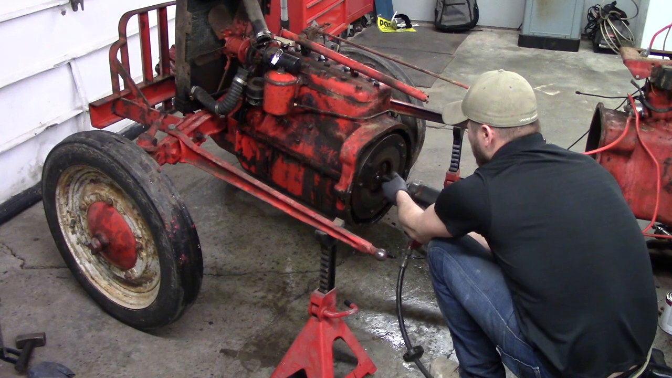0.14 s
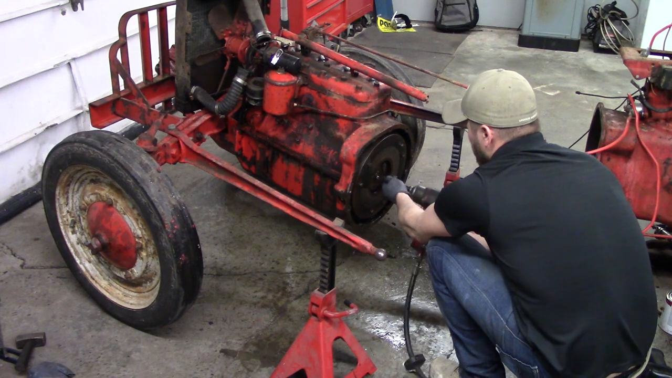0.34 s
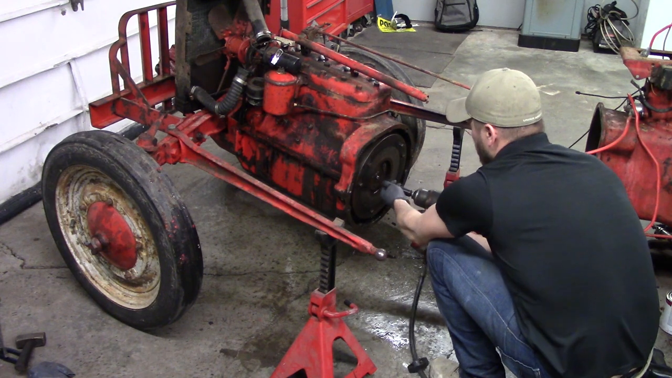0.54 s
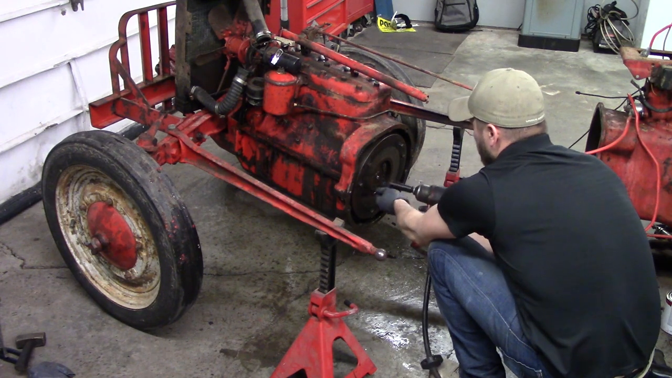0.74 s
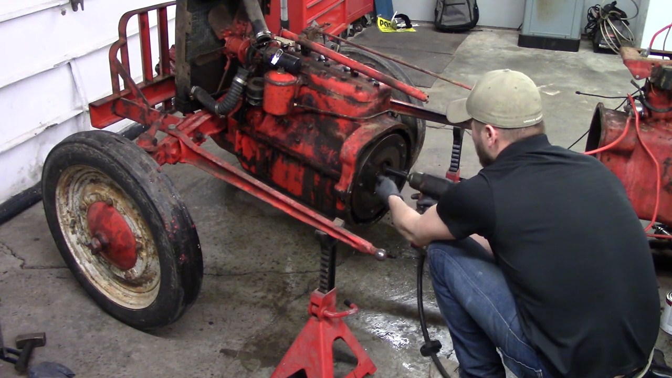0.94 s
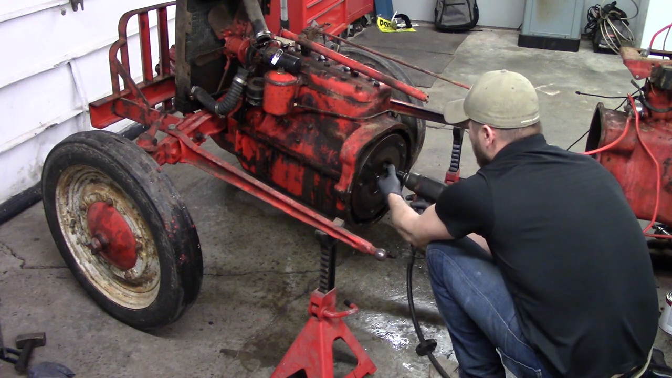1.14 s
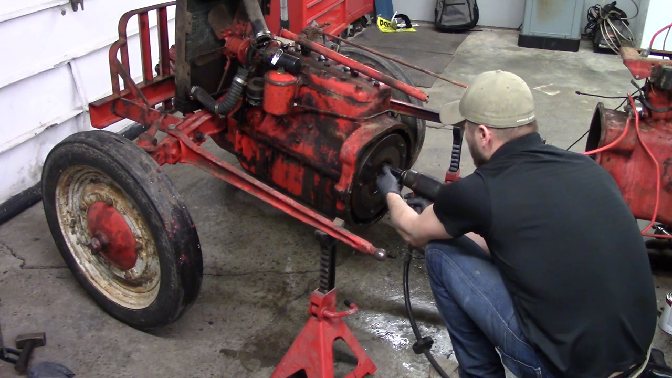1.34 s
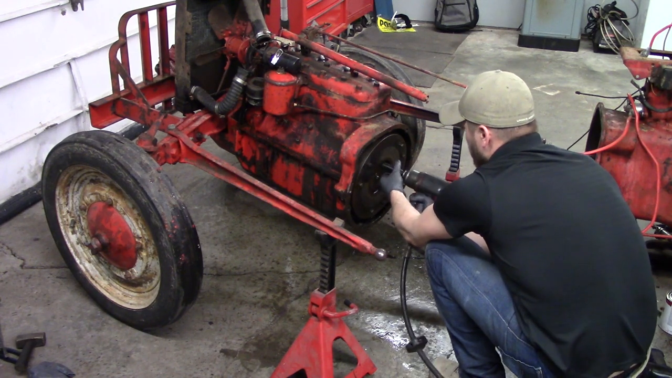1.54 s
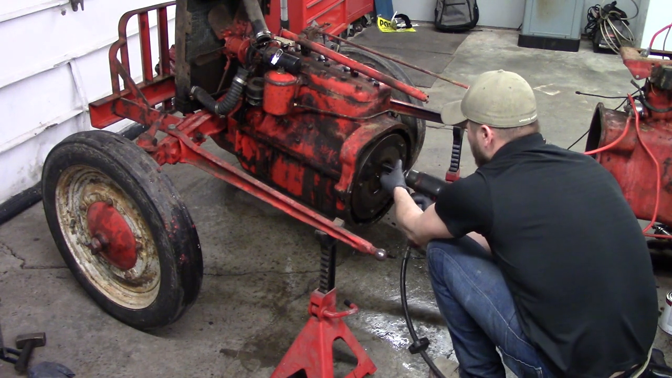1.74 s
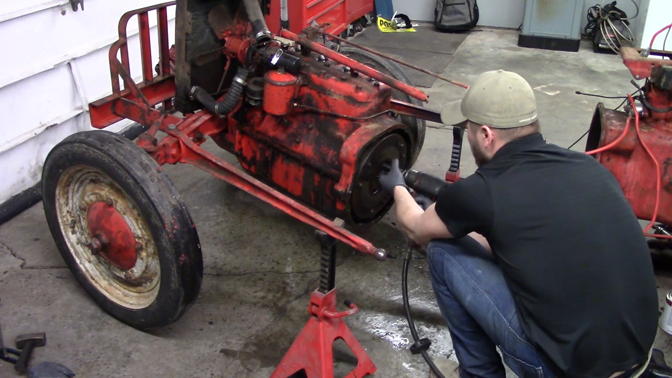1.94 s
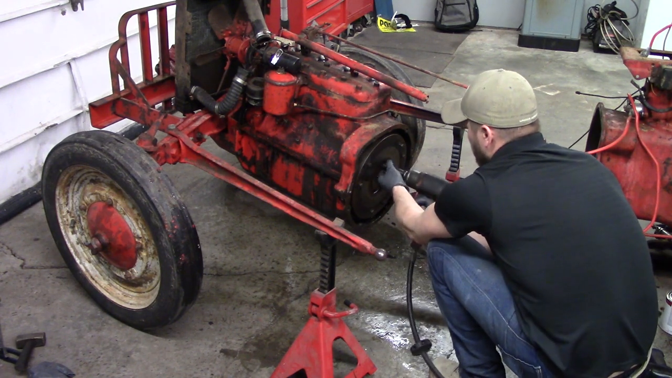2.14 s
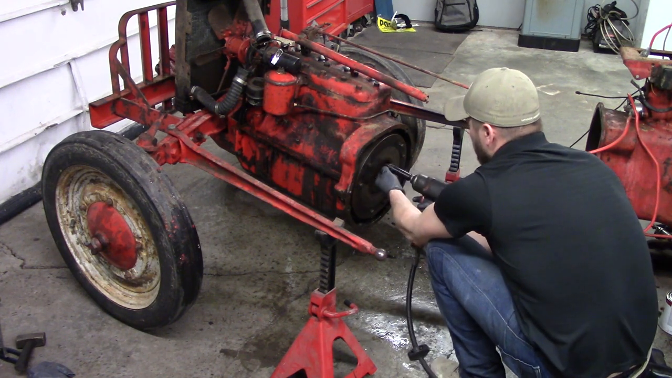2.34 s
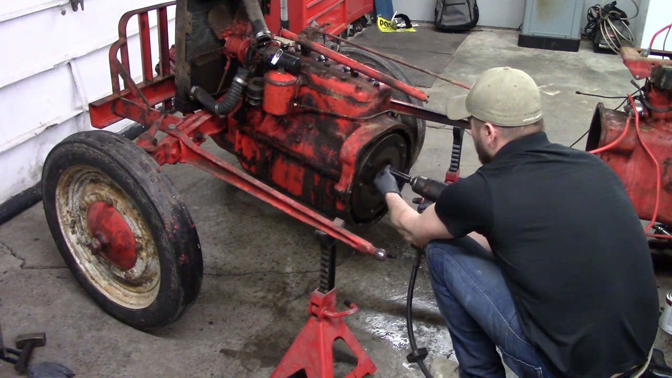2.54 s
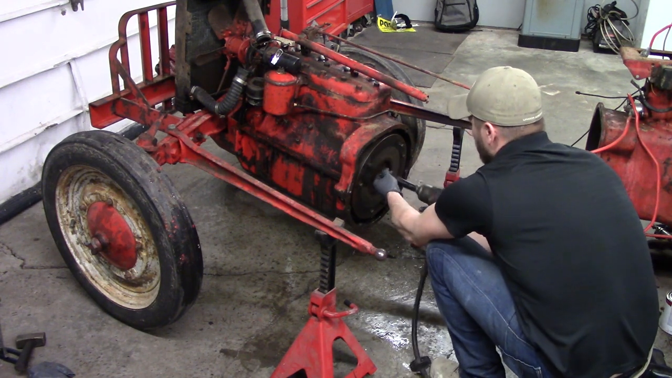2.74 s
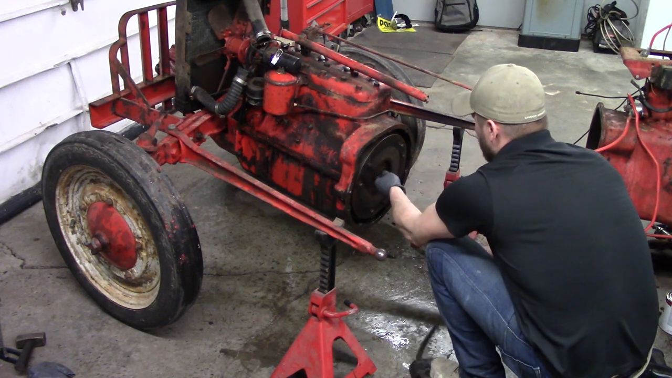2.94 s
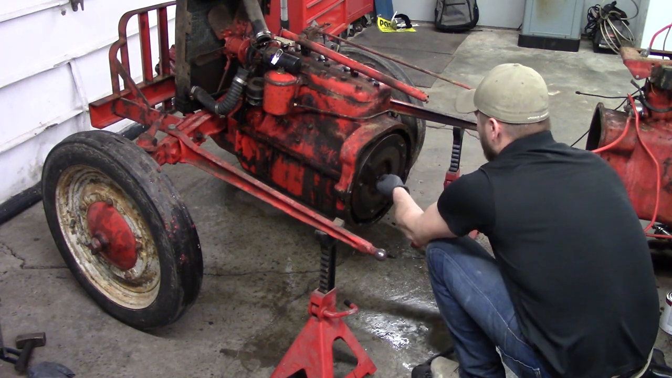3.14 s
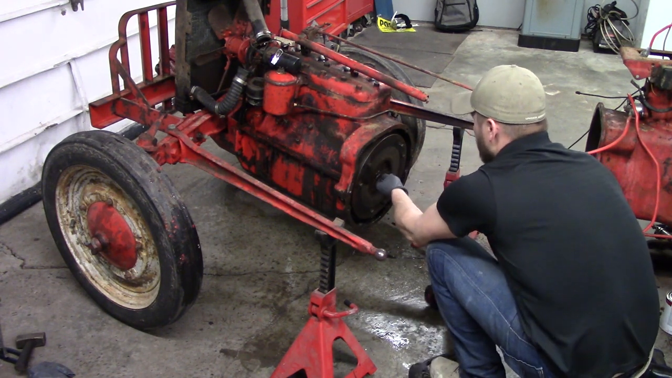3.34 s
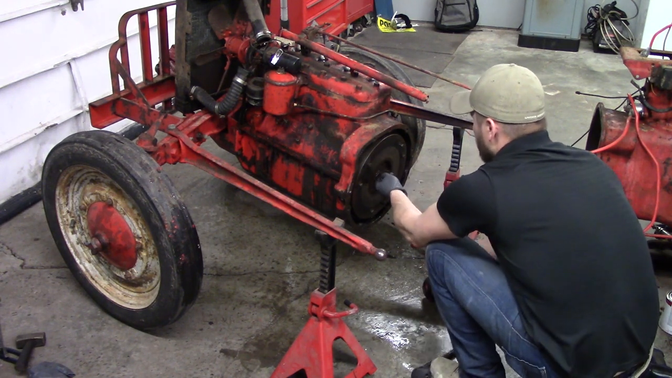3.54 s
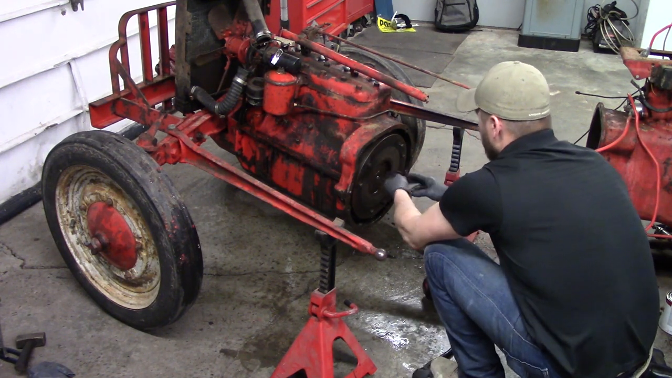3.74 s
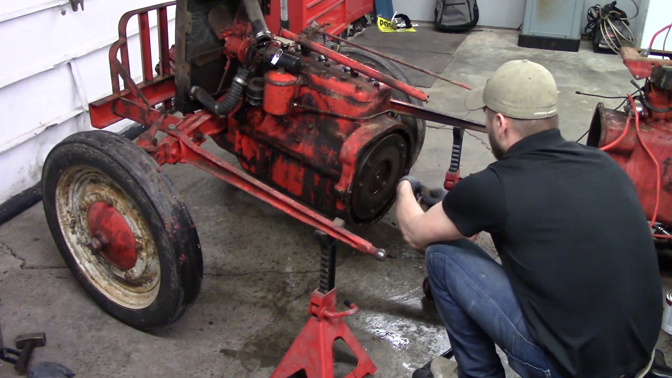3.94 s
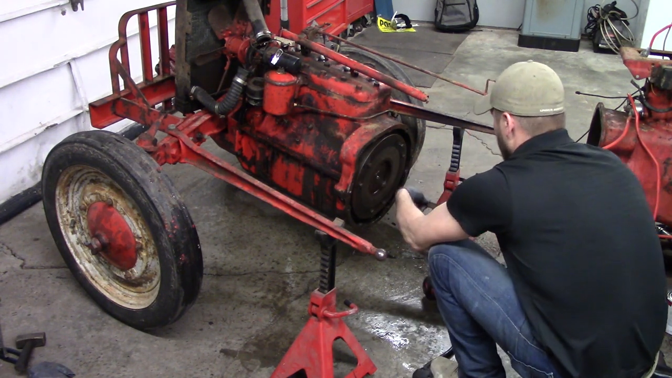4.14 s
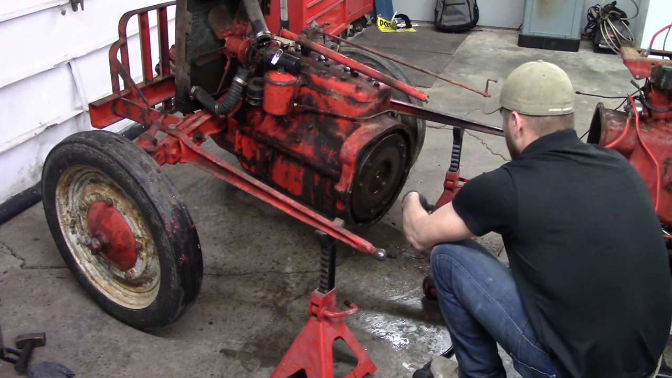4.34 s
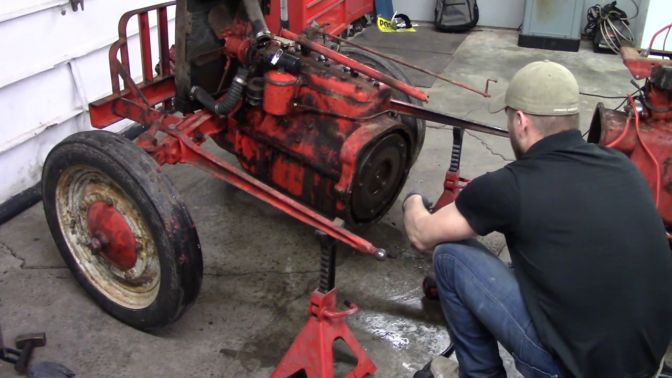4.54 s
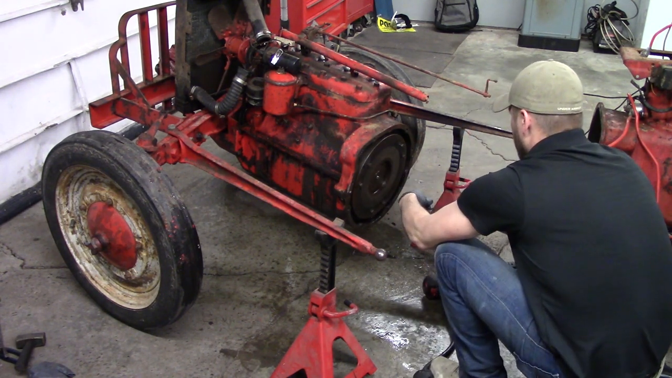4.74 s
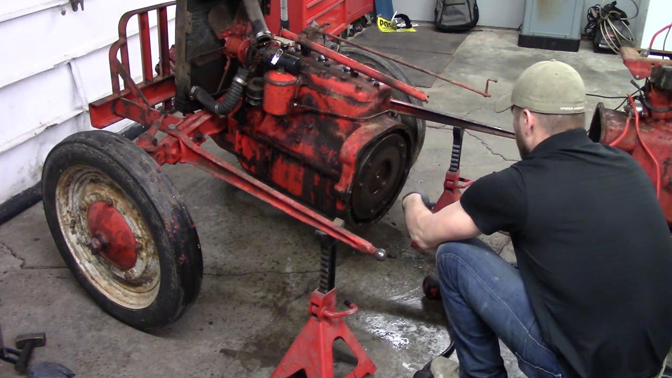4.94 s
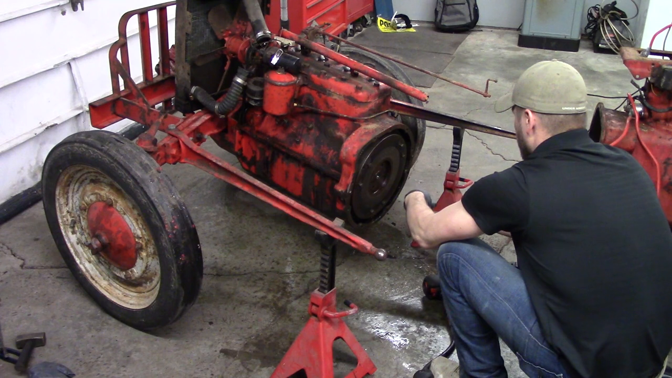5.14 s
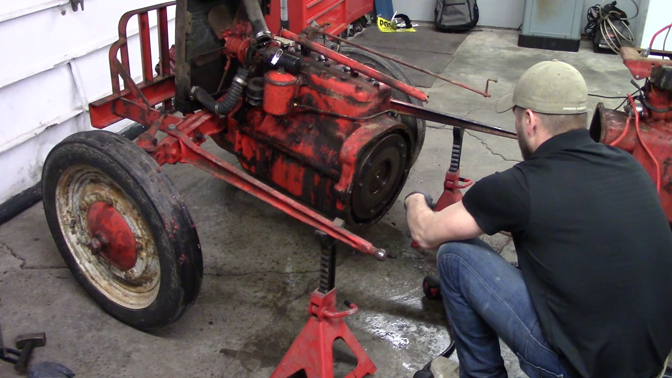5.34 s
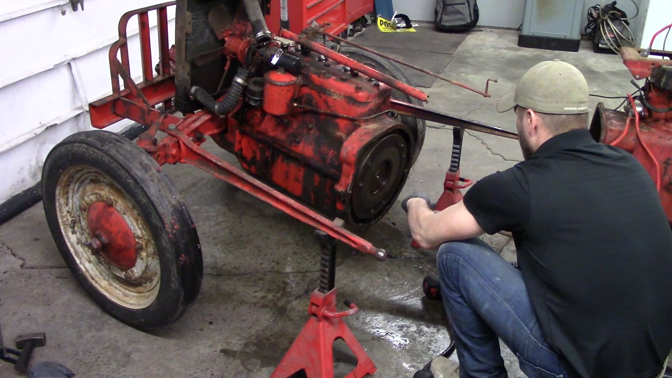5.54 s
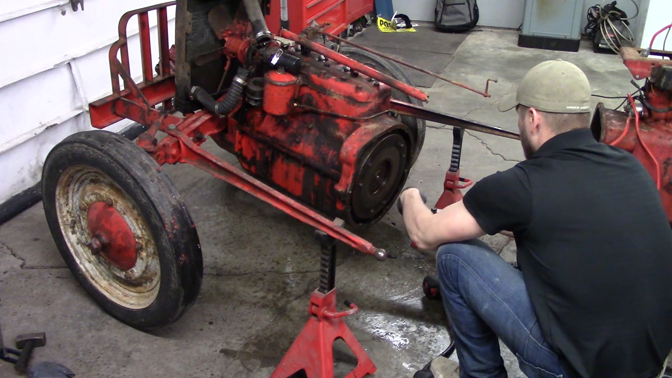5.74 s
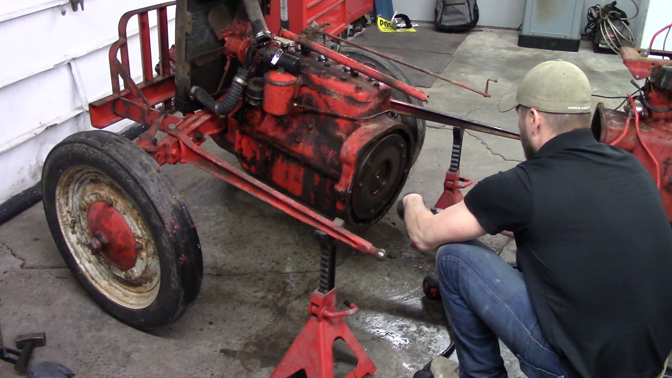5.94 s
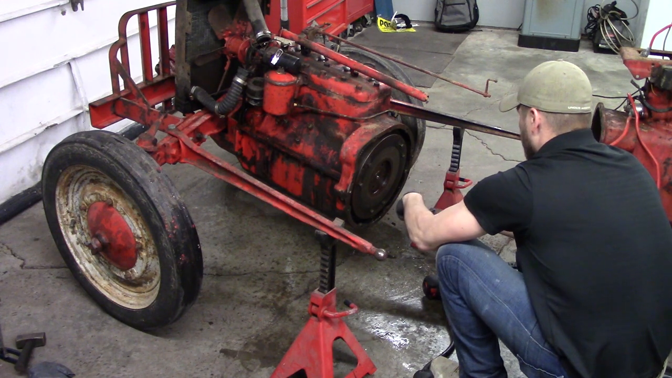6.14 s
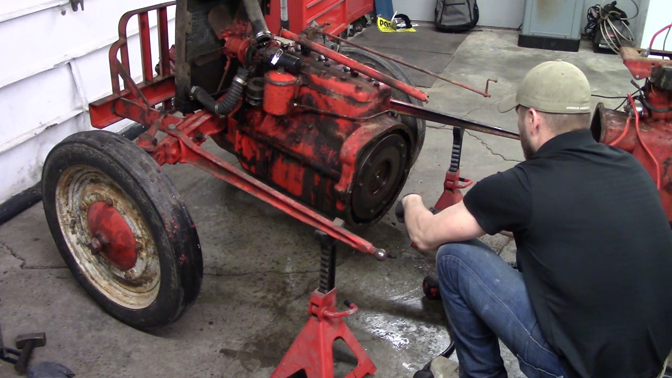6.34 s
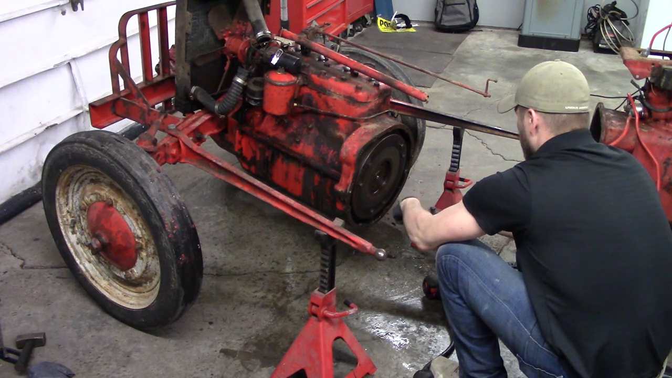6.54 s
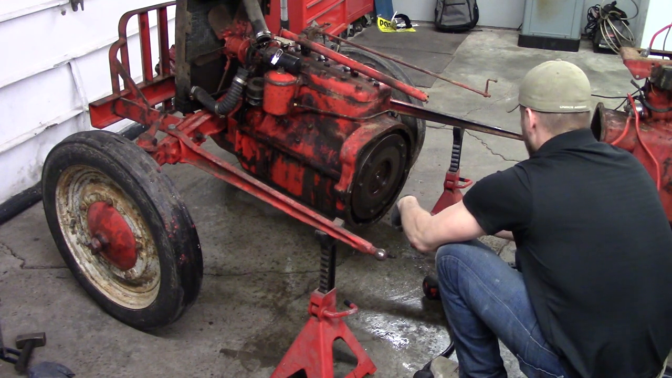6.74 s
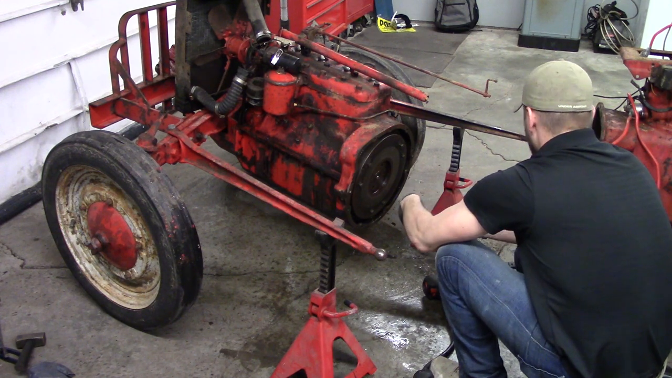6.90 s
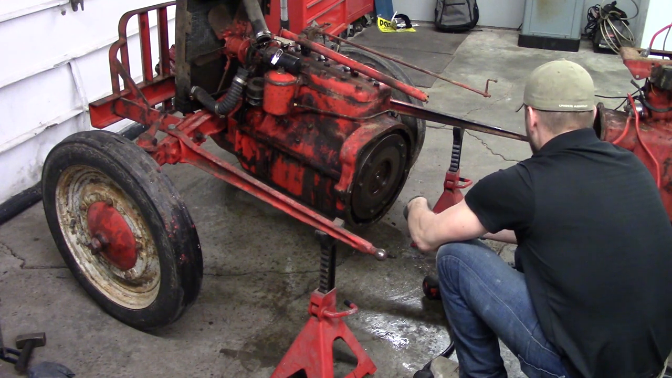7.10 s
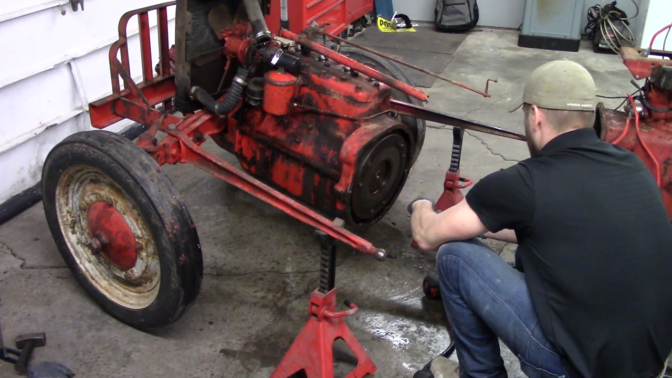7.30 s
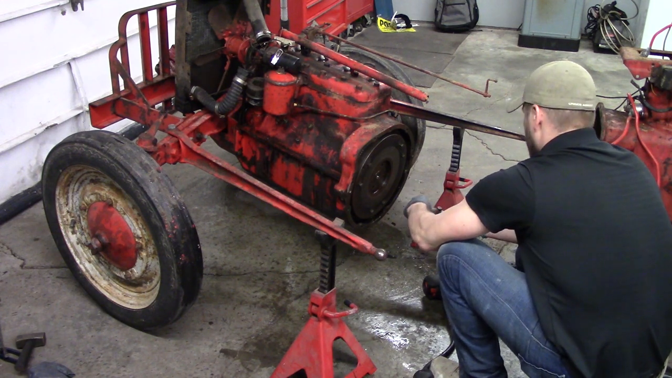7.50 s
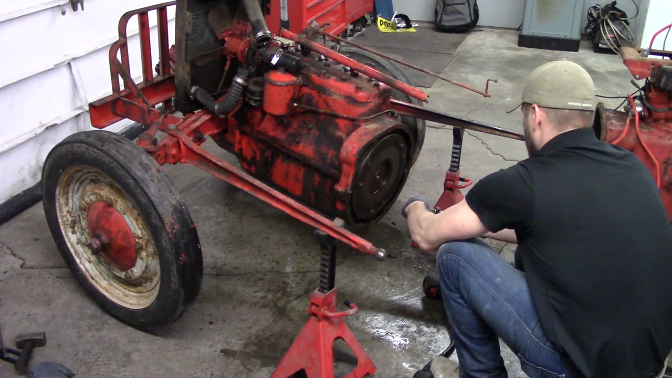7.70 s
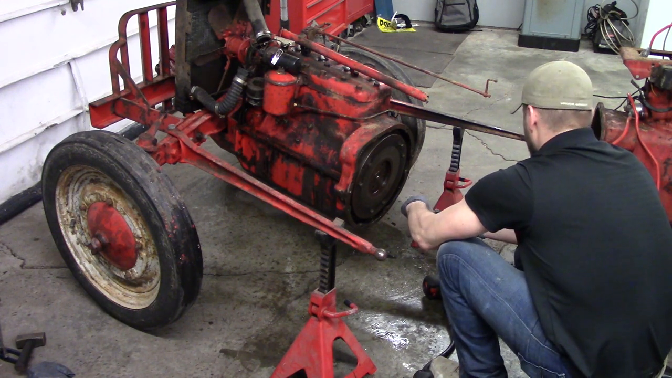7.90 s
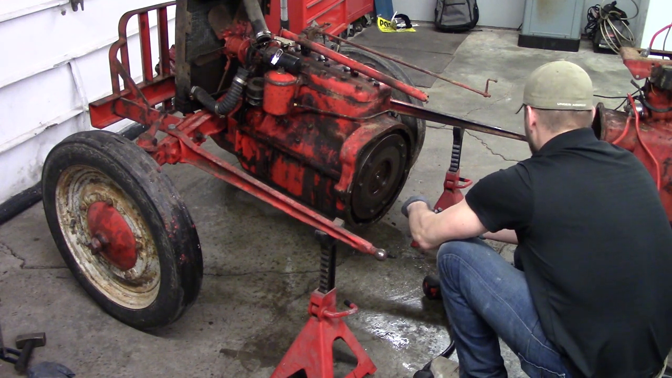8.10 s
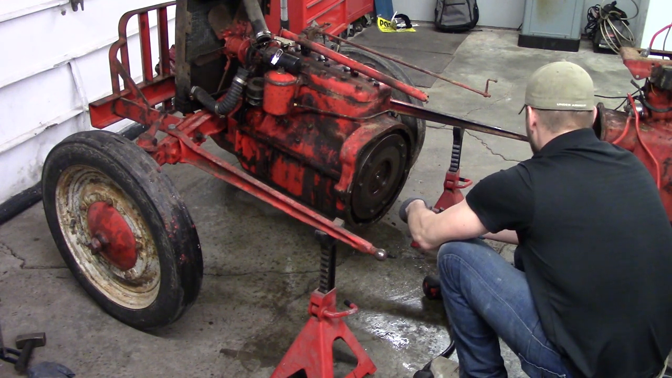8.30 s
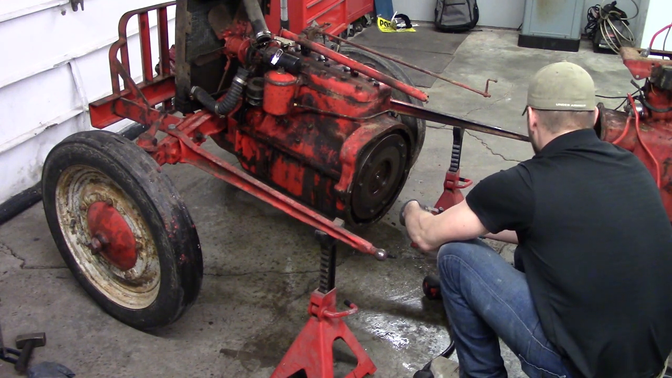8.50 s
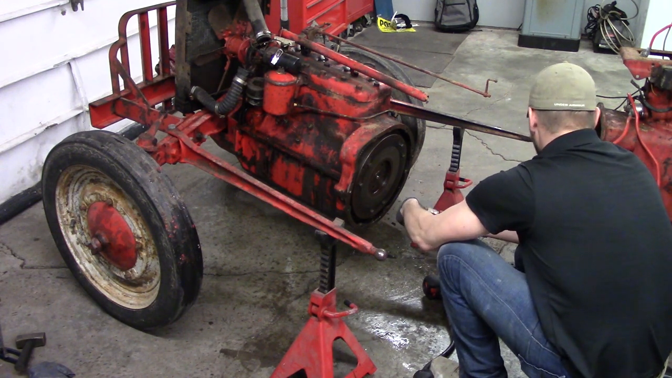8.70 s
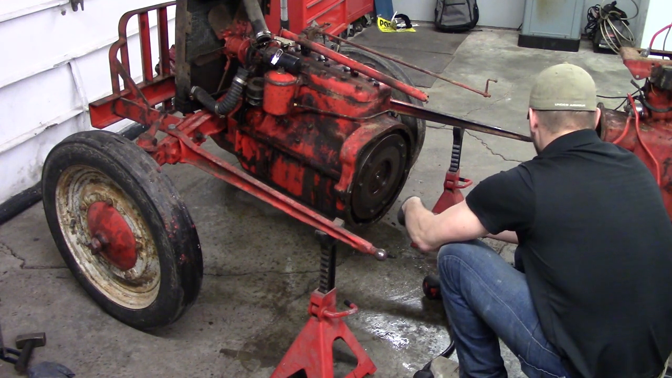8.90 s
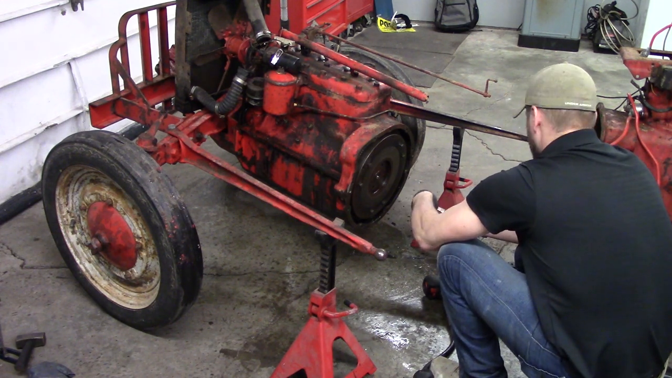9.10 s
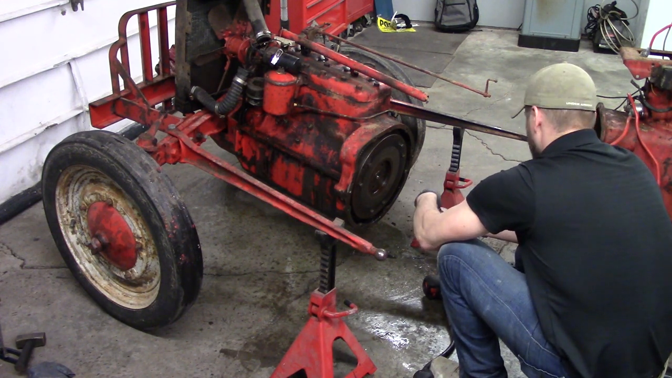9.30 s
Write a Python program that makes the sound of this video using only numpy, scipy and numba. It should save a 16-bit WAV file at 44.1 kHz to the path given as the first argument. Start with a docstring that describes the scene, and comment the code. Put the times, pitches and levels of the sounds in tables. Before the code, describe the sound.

Two loud bursts of a pneumatic wrench, rattling hammer blows turning into a rising whine with hissing exhaust, echo off bare walls. Between them are dull engine knocks; afterwards a thin metal tinkle, then a sharp heavy knock and dropped socket clatter. Quiet handling of bolts and sockets clicks irregularly to the end above a steady fan-like rumble. Camera microphone, almost mono, loud parts limited.

```python
"""Air impact wrench in a bare garage

Two trigger pulls, the first already under way: vane puffs and exhaust air hammer a bolt loose, whine up and run down.
Noise cracks with ringing modes make knocks on the engine, a dropped socket and a tinkling part; bolt and socket click
and scrape in the hands. A noise drone lies behind, and hard walls answer with decaying noise. The wrench and the
rings send less to the walls than the cracks do. A near-mono camera microphone limits the loud parts."""
import sys
import numpy as np
from scipy import signal
from scipy.fft import rfft, irfft
from scipy.io import wavfile
from scipy.ndimage import uniform_filter1d, minimum_filter1d
from numba import njit

SR = 44100
rng = np.random.default_rng(int(sys.argv[2]) if len(sys.argv) > 2 else 0)


def digitize_waveform(pressure):
    """Quantize a signal to 16-bit integers and store it at the path in sys.argv[1].

    Rows of a 2-D input are taken as channels; values are limited to [-1, 1].
    """
    field = np.atleast_2d(pressure).T
    bounded = np.clip(field, -1, 1)
    quanta = np.round(bounded * 32767).astype(np.int16)
    wavfile.write(sys.argv[1], SR, quanta)


N = 412776

# Trigger pulls: (pulled [s], bolt breaks free [s], let go [s], extra level around breaking free [dB])
PULLS = [(-.4, -.045, .245, 14), (1.445, 1.775, 2.08, -2.5)]
# Motor levels in the stages of a pull: (time into the stage [s], whine level [dB], exhaust air level [dB])
HAMMERING = [(0, -69, -51), (.02, -40, -20), (.038, -34, -32), (.05, -11.5, -18), (.1, -16.5, -15)]
SPINNING = [(-.03, -15, -20), (0.063, -9, -20.5), (.15, -1, -21), (.23, -12, -26)]
COASTING = [(.02, -11, -24.5), (0.069, -23, -20), (.14, -25.5, -32), (.24, -62, -39)]
# Harmonics of the vane rate: (multiple, level [dB])
VANE_ORDERS = [(1, -6), (2, 0), (3, -7), (4, -15), (5, -14), (6, -19), (7, -21), (8, -23)]
# Tone of the exhaust outlet: (frequency [Hz], gain [dB])
EXHAUST = [(110, -28), (170, -3.5), (600, -5.5), (1000, 0), (1300, -1), (1700, -6), (2400, -5.5),
           (4000, -20)]
# Spectrum of the hissing exhaust air: (frequency [Hz], density [dB per Hz])
AIR = [(1100, -21.5), (1700, -5.5), (2100, -6.5), (2450, 2), (2900, -2.5), (3500, -2.5), (3950, -4.5),
       (4400, -1.5), (5000, -6), (8000, -7.5), (12000, -13.5), (16000, -19)]
# Hammer blows on the anvil and their rebounds: (time [s], level [dB])
BLOWS = [(1.488, 1), (1.506, -3), (1.533, 1), (1.588, 4), (1.643, 2), (1.674, -2), (1.697, 1), (1.726, -2),
         (1.751, 2), (1.804, 2), (1.857, 0), (1.878, -5)]
# Wrench knocks on engine and floor: (time [s], level [dB], crack centre [Hz], ring re crack [dB])
KNOCKS = [(.828, -38.5, 1994, -23), (1.045, -11.5, 2100, -3.5), (1.277, -34, 1960, -6),
          (1.315, -17.5, 1950, -3.5), (3.189, 2, 2290, -26), (3.2, -7.5, 540, -37)]
# Modes of the engine: (frequency [Hz], level [dB], undamped t60 [s])
ENGINE_MODES = [(592, -8, .1), (1357, -1, .1), (1970, -13, .06), (2320, -9, .06), (2885, -13, .06),
                (3400, -10, .1), (4650, -16, .05), (7600, -18, .04)]
# Bounces of the dropped socket: (time [s], level [dB], crack centre [Hz], ring re crack [dB])
BOUNCES = [(3.394, 1, 2100, -39), (3.407, -3, 3500, -8), (3.425, -3, 2120, -20), (3.46, -9, 2270, -19)]
# Modes of the socket: (frequency [Hz], level [dB], undamped t60 [s])
SOCKET_MODES = [(1949, -10, .3), (2070, -11, .35), (2283, -9, .28), (2487, 2, .33), (2982, -14, .3),
                (3693, -4, .4), (3887, -7, .4), (5001, -14, .36), (5749, -13, .33), (6562, -11, .15),
                (7650, -18, .3)]
# Tinkles of a thin steel part: (time [s], level [dB], crack centre [Hz], ring re crack [dB])
TINKLES = [(2.272, -12, 7450, -40), (2.385, -28, 8600, -18), (2.429, -18.5, 8400, -16),
           (2.659, -28.5, 6660, -36), (3.67, -52, 8900, 11)]
# Modes of the thin steel part: (frequency [Hz], level [dB], undamped t60 [s])
PIN_MODES = [(5728, -14, .2), (6239, -3, .36), (8183, 0, .28), (8570, -10, .2), (10060, -16, .2),
             (12110, -16, .2)]
# Bolt and socket clicks in the hands: (time [s], level [dB], crack centre [Hz])
CLICKS = [(2.9931, -39, 8600), (4.6654, -32.5, 3520), (4.829, -34, 3680), (4.8505, -24, 2500),
          (5.1294, -38, 2050), (5.278, -11.5, 6180), (5.2958, -29, 5330), (5.356, -22, 6630),
          (5.4746, -16.5, 2930), (6.1787, -30.5, 3610), (6.2154, -24.5, 2640), (6.36, -37, 3690),
          (6.403, -21.5, 3690), (6.468, -32, 5150), (6.5354, -13.5, 3120), (6.5558, -13.5, 3840),
          (6.7842, -30, 1955), (7.4313, -28, 2000), (7.6024, -33.5, 2050), (7.6891, -31, 2160),
          (7.7374, -33, 2620), (7.7654, -28.5, 2600), (7.817, -25, 2610), (7.887, -26, 8040),
          (7.8977, -21, 2720), (8.075, -24, 2700), (8.2215, -16.5, 2860), (8.305, -22.5, 2830),
          (8.3162, -17.5, 2710), (8.4168, -24.5, 3140)]
# Modes of the bolt: (frequency [Hz], level [dB], undamped t60 [s])
BOLT_MODES = [(1760, -6, 0.023), (2726, -6.5, 0.031), (3570, -14, 0.032), (4530, -16, 0.018),
              (5200, -7, 0.031), (6300, -2, 0.026), (7930, -10.5, 0.04), (8400, -12, 0.094),
              (9860, -17, 0.048), (13050, -7, 0.042), (13520, -7, .02)]
# Scrapes of thread and gloves: (start [s], end [s], level at start [dB], level at end [dB])
SCRAPES = [(2.901, 3.17, -48, -39.5), (4.61, 5.0, -47.5, -54), (6.08, 6.5, -43, -58),
           (7.55, 7.878, -57, -44), (8.42, 8.75, -44, -54)]
# Reverberation bands of the bare walls: (frequency [Hz], t60 [s])
GARAGE = [(150, 0.28), (500, 0.67), (1500, 0.62), (4000, 0.61), (9000, 0.29), (14000, 0.17)]
# Spectrum of the drone: (frequency [Hz], density [dB per Hz])
DRONE = [(15, -83), (25, -41), (43, -16), (70, -32), (97, -9), (185, -10), (249, 1), (301, -5), (463, -5),
         (503, -7.5), (840, -16), (1940, -22.5), (3430, -38), (5730, -39.5), (16000, -62)]
# Wavering resonances of the drone: (frequency [Hz], width [Hz], level [dB])
HUMS = [(236, 25, -43.5), (419.5, 13.6, -44), (522.7, 20, -52.5)]
# Swells of the lowest hum: (time [s], level [dB])
HUM_SWELL = [(0.0, -67), (1.33, -43), (1.82, -67), (2.29, -59), (4.69, -45), (4.9, -65), (5.86, -42),
             (6.62, -49), (7.59, -52), (7.77, -45), (7.97, -62), (8.39, -45), (8.86, -64), (9.36, -53)]
# Side signal at the microphone: (frequency [Hz], gain [dB])
SIDE_GAIN = [(40, -20), (125, -21), (250, -28.5), (700, -24), (2000, -22), (5000, -14), (10000, -17.5),
             (12000, -15), (15000, 7)]

# Vane rate before chatter: as the bolt breaks free, slow climb towards it, spin-up time constant
LOADED_HZ, CREEP_HZ_PER_S, START_S = 199.34, 130, .022
# Vane rate without load, time constants of the rise to it and of the fall after letting go
FREE_HZ, SPIN_UP_S, RUN_DOWN_S = 522, .055, .23
SURGE_S = 0.053  # time constant of the extra level on both sides of breaking free
# Chatter of the vanes (roughness 0-1) in each stage, and the time of a change
ROUGH_LOADED, ROUGH_FREE, ROUGH_COASTING, CHANGE_S = 1, .08, .3, .045
STALL = .35  # share of motor speed lost at a blow at full roughness
BLOW_CRACK_HZ, BLOW_RING_DB = 4860, -23
CLICK_RING_DB, HANDS_LOW_HZ = -11.5, 1250  # small parts give little sound under this pitch
# How strongly each source reaches the walls, and the energy of the tail
WRENCH_WET_DB, RING_WET_DB, HANDS_WET_DB, WET_DB = -7.5, -7, -1, 4.5
DRONE_ROAR_DB = -37.5
MIC_LOW_HZ, MIC_HIGH_HZ, TOP_HZ = 71.4, 12100, 16200
LIMIT_DB, RELEASE_S = -.8, 0.028


def wrench():
    """Vanes chop the air into the exhaust; each hammer blow stalls the loaded rotor, which speeds up again."""
    t = np.arange(N) / SR
    running, hz, whine_db, air_db, rough = trigger()
    blows = np.transpose(BLOWS)[0]
    last_blow = np.append(-1, blows)[np.searchsorted(blows, t)]
    hz = hz * (1 - STALL * rough * np.exp(-(t - last_blow) / .012))
    # chatter scatters pitch and size of the puffs
    hz = hz * np.exp(.2 * rough * walk(200))
    turns = np.cumsum(hz) / SR
    f, gain_db = np.transpose(EXHAUST)
    whine = np.zeros(N)
    for k, db in VANE_ORDERS:
        outlet_db = np.interp(k * hz, f, gain_db)
        whine += undb(db + outlet_db) * np.sin(2 * np.pi * k * turns)
    whine *= undb(7.0 * rough * walk(300) + 1.07 * walk(60) - 5 * rough)
    # a coasting rotor still blows across the exhaust pipe, which sings near its resonance
    coasting = np.clip(1 - np.abs(rough - ROUGH_COASTING) / .25, 0, 1)
    breath = band(rng.standard_normal(N), 1056, 200)
    pipe = coasting * level(band(breath, 1056, 200), -2)
    # a labouring rotor dumps its air in a broad roar
    roar_points = [(60, -56), *EXHAUST, (16000, -23)]
    roar = level(colour(rng.standard_normal(N), roar_points), 4.2)
    roar = rough * roar * undb(1.95 * walk(90))
    # the hiss pulses once per vane puff
    air = colour(rng.standard_normal(N), AIR) * (0.44 + np.exp(-(turns % 1) / 0.35))
    return running * (undb(whine_db) * (whine + pipe + roar) + undb(air_db) * level(air, 0))


def trigger():
    """Load sets vane rate, whine dB, air dB and chatter through each pull: hammering, spinning free, coasting."""
    t, out = np.arange(N) / SR, np.zeros((5, N))
    for pulled, free, let_go, surge_db in PULLS:
        start = 1 - np.exp(-np.maximum(t - pulled, 0) / START_S)
        loaded = (LOADED_HZ + CREEP_HZ_PER_S * np.minimum(t - free, 0)) * start
        x = np.maximum(t - free, 0) / SPIN_UP_S
        spin_up = (FREE_HZ - LOADED_HZ) * (1 - (1 + x) * np.exp(-x))
        run_down = np.exp(-np.maximum(t - let_go, 0) / RUN_DOWN_S)
        hz = (loaded + spin_up) * run_down
        stages = ((pulled, HAMMERING), (free, SPINNING), (let_go, COASTING))
        whine_db, air_db = curve([(start_s + s, w, a) for start_s, rows in stages for s, w, a in rows])
        surge = surge_db * np.exp(-np.abs(t - free) / SURGE_S)
        change_times = [free + CHANGE_S / 2, free + 1.5 * CHANGE_S, let_go - CHANGE_S, let_go + CHANGE_S / 2]
        rough = np.interp(t, change_times, [ROUGH_LOADED, ROUGH_FREE, ROUGH_FREE, ROUGH_COASTING])
        running = (t >= pulled) & (t < let_go + COASTING[-1][0])
        motor = np.array([running, hz, whine_db + surge, air_db + surge, rough])
        out[:, running] = motor[:, running]
    return out


def metal():
    """Hammer blows, knocks, socket bounces and tinkles: cracks of contact and rings of the struck parts."""
    blows = [(s, db, BLOW_CRACK_HZ, BLOW_RING_DB) for s, db in BLOWS]
    return (strikes(blows, ENGINE_MODES, damp=.2, crack_s=.004, scatter_db=4)
            + strikes(KNOCKS, ENGINE_MODES, damp=0.5, crack_s=0.0072, scatter_db=2.5)
            + strikes(BOUNCES, SOCKET_MODES, damp=0.65, crack_s=0.0042, scatter_db=1.5, drift=.0004)
            + strikes(TINKLES, PIN_MODES, damp=0.9, crack_s=.003, scatter_db=2.5))


def strikes(events, modes, damp, crack_s, scatter_db, drift=0.0016):
    """Each blow is a short crack of noise plus the modes of the part, struck at a new place every time."""
    out, t = np.zeros((2, N + SR)), np.arange(SR // 2) / SR
    hz, db, t60 = np.transpose(modes)[:, :, None]
    # gripped or resting parts ring shorter than t60 by damp
    decay = np.exp(-np.log(1000) * t / (np.minimum(t60, .6) * damp))
    crack_shape = np.exp(-t / crack_s / 6) * (1 - np.exp(-t / 0.00048))
    for s, peak_db, crack_hz, ring_db in events:
        place, detune = rng.standard_normal((2, len(hz), 1))
        burst = rfft(rng.standard_normal(len(t)) * np.exp(-t / crack_s))
        # many tiny contacts: an even spectrum without lumps
        even = irfft(burst / np.abs(burst), len(t)) * np.sqrt(crack_s * SR / 2)
        crack = band(even * crack_shape, crack_hz, 1.34 * crack_hz)
        tones = np.sin(2 * np.pi * hz * (1 + drift * detune) * t)
        ring = undb(db + ring_db + scatter_db * place) * tones * decay
        first = int(s * SR)
        out[:, first:first + len(t)] += undb(peak_db) * np.array([crack, ring.sum(axis=0)])
    return out[:, :N]


def hands():
    """Small steel parts click and scrape in the hands, too small to radiate much bass."""
    clicks = [(*click, CLICK_RING_DB) for click in CLICKS]
    cracks, rings = strikes(clicks, BOLT_MODES, damp=0.45, crack_s=0.0033, scatter_db=3.0)
    low_cut = signal.butter(2, HANDS_LOW_HZ, "high", fs=SR, output="sos")
    return signal.sosfilt(low_cut, scrape() + cracks + rings)


def scrape():
    """Dense tiny slips of steel on steel, uneven in size, excite the modes of the bolt."""
    t, on = np.arange(N) / SR, np.zeros(N)
    for start, end, start_db, end_db in SCRAPES:
        on += (t >= start) * (t < end) * undb(np.interp(t, [start, end], [start_db, end_db]))
    slips = rng.random(N) < 2500 / SR  # 2500 a second on average
    slips = slips * undb(2 * rng.exponential(size=N)) * rng.choice([-1, 1], N)
    steel = sum(undb(db) * band(slips, f, f / 8) for f, db, _ in BOLT_MODES)
    steel += 2.7 * band(slips, 2800, 2500)
    return uniform_filter1d(on, size=800) * level(steel, -13.5)


def garage(x):
    """Bare walls: a dense tail that dies sooner in the treble, one for mid and one for side."""
    t, tail = np.arange(SR) / SR, np.zeros((2, SR))
    for hz, t60 in GARAGE:
        tail += band(rng.standard_normal((2, SR)), hz, 0.97 * hz) * np.exp(-np.log(1000) * t / t60)
    wall_tone = [(60, -26), (200, 14.0), (1000, 9.5), (5000, 2.0), (10000, 0.5), (15000, -6.0)]
    tail = colour(tail * (1 - np.exp(-t / 0.0018)), wall_tone)
    tail *= undb(WET_DB) / np.sqrt(np.sum(tail ** 2) / 2)
    return signal.fftconvolve(x[None], tail, axes=1)[:, :N]


def drone():
    """A low fan-like roar of shaped noise with a few wavering resonances; returns mid and side."""
    roar = level(colour(rng.standard_normal((2, N)), DRONE), DRONE_ROAR_DB)
    hums = np.zeros(N)
    for hz, width, db in HUMS:
        hums += level(band(rng.standard_normal(N), hz, width), db) * undb(1.67 * walk(2.883))
    low_hum = level(band(rng.standard_normal(N), 107.3, 3.2), 0.62)
    low_hum *= undb(curve(HUM_SWELL)[0])
    return roar[0] * undb(0.24 * walk(2.14)) + hums + low_hum, roar[1]


def undb(db):
    """Amplitude ratio of a level in dB."""
    return 10 ** (np.asarray(db) / 20)


def level(x, db):
    """Scales a signal to an RMS level in dB re full scale."""
    return x * undb(db) / np.sqrt(np.mean(x ** 2))


def band(x, hz, width):
    """A resonance with gain 1 at the centre."""
    b, a = signal.iirpeak(hz, hz / width, SR)
    return signal.lfilter(b, a, x)


def colour(x, points):
    """Shapes the spectrum along (frequency [Hz], gain [dB]) points on a log frequency axis."""
    hz, db = np.transpose(points)
    f = np.maximum(np.fft.rfftfreq(x.shape[-1], 1 / SR), 1)
    gain = undb(np.interp(np.log(f), np.log(hz), db))
    return irfft(rfft(x) * gain, x.shape[-1])


def walk(rate):
    """Random levels held 1 / rate s and slewed twice, with a spread of 1."""
    k = int(SR / rate)
    steps = np.repeat(rng.standard_normal(N // k + 1), k)
    steps = uniform_filter1d(uniform_filter1d(steps, k), k)[:N]
    return steps / steps.std()


def curve(rows):
    """Interpolates the columns of (time [s], value, ..) rows to one value a sample."""
    s, *columns = np.transpose(rows)
    return [np.interp(np.arange(N) / SR, s, c) for c in columns]


@njit
def limiter(x, top, release):
    """Gain that drops at once on a peak over the top and creeps back."""
    gain, envelope = np.empty(len(x)), top
    for i in range(len(x)):
        envelope = max(x[i], top + (envelope - top) * release)
        gain[i] = top / envelope
    return gain


def scene():
    """Direct sounds and drone in the middle; the walls answer in mid and side."""
    tool, handling = wrench(), hands()
    cracks, rings = metal()
    to_walls = cracks + undb(HANDS_WET_DB) * handling + undb(RING_WET_DB) * rings + undb(WRENCH_WET_DB) * tool
    wet_mid, wet_side = garage(to_walls)
    roar, roar_side = drone()
    mid = tool + handling + cracks + rings + wet_mid + roar
    side = colour(wet_side + roar_side, SIDE_GAIN)
    return np.array([mid + side, mid - side])


def record(dry):
    """The camera microphone thins bass and top, limits peaks looking a millisecond ahead, and cuts the top."""
    mic = signal.butter(2, [MIC_LOW_HZ, MIC_HIGH_HZ], "band", fs=SR, output="sos")
    dry = signal.sosfilt(mic, dry)
    peak = -minimum_filter1d(-np.abs(dry).max(axis=0), size=89)  # samples: 1 ms either way
    gain = limiter(peak, float(undb(LIMIT_DB)), np.exp(-1 / (RELEASE_S * SR)))
    gain = uniform_filter1d(gain, size=45)
    top_cut = signal.ellip(10, .2, 90, TOP_HZ, fs=SR, output="sos")
    return signal.sosfilt(top_cut, dry * gain)


dry = scene()
out = record(dry)
digitize_waveform(out)
```